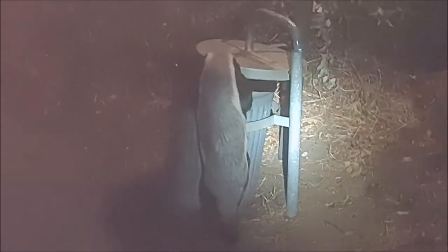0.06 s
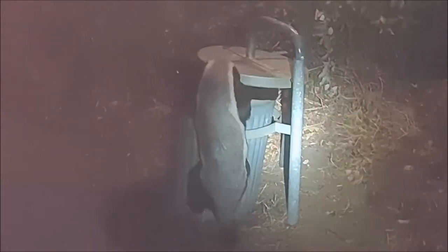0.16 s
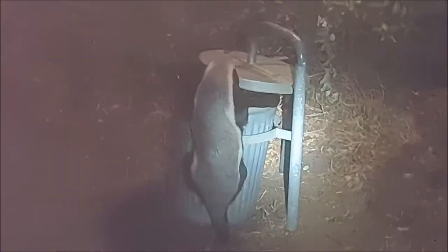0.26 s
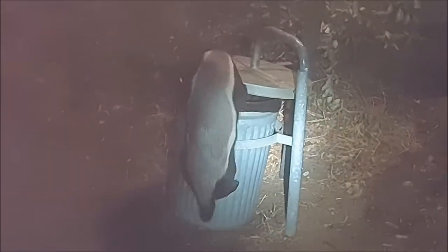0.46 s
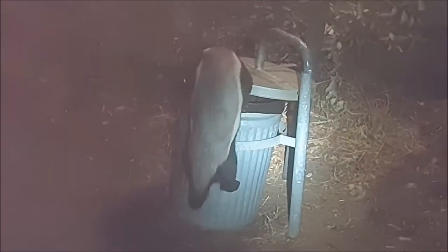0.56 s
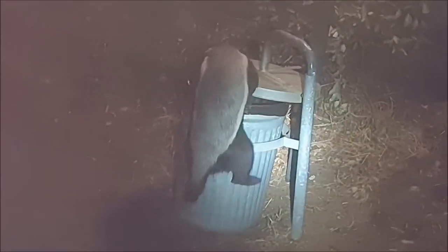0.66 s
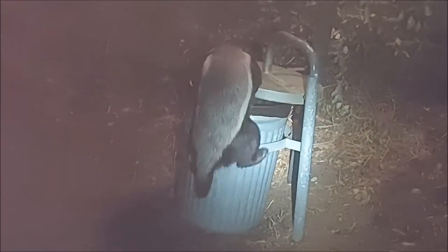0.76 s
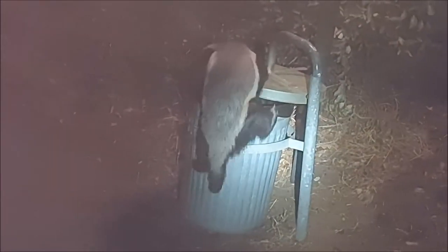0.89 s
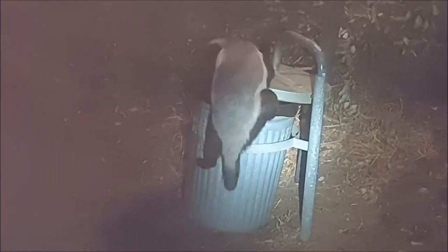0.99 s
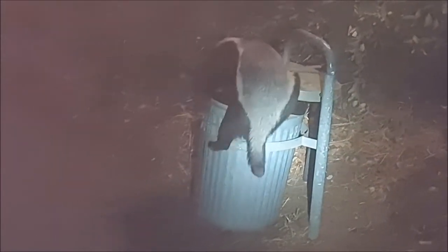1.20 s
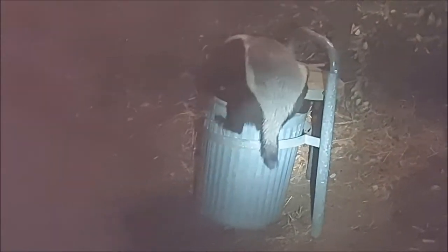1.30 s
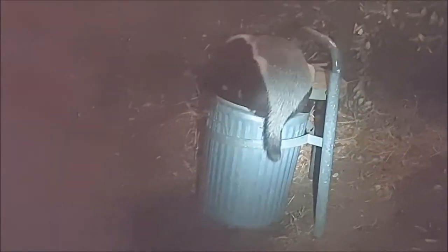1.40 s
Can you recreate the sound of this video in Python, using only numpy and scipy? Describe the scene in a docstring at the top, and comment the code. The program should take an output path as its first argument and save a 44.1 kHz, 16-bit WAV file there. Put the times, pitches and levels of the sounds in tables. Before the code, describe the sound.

A metal bin clatters close by as an animal climbs it. After faint taps, it slams loudly into its holder from about 0.25 to 0.5 seconds, with a low boom, scraping and a hollow ring. Claws drag from 0.55, with a few short knocks near 0.7. Lighter knocks and scratches follow from 1.0 to 1.4 seconds. The yard behind is very quiet, with only a faint echo.

```python
"""A ribbed metal bin clatters in its steel frame as an animal hauls itself up it.
A yard on a still night, the stereo microphone close by, with only a faint echo behind.
The bin slams against its holder and its wall booms as it flexes; claws scrape and knock on the metal.
Every contact rings the same shell: a few strong low modes under a dense wash of high ones."""
import sys
import numpy as np
from scipy import signal
from scipy.fft import rfft, irfft
from scipy.io import wavfile
from scipy.ndimage import uniform_filter1d

SR = 44100
rng = np.random.default_rng(int(sys.argv[2]) if len(sys.argv) > 2 else 0)


def dump_mix(stems):
    """Bounce the given channels to the path in sys.argv[1] as a 16-bit WAV at rate SR."""
    frames = np.atleast_2d(stems).T  # one column per channel
    limited = np.clip(frames, -1, 1)  # hard clip at full scale
    pcm = np.round(limited * 32767).astype(np.int16)
    wavfile.write(sys.argv[1], SR, pcm)


N = 63945
T = np.arange(N) / SR
RING_N = 3 * SR // 4  # samples in one ring of the sheet metal
BANDS_HZ = 32 * 2 ** (np.arange(37) / 4)
COLOUR_HZ = [110, 1000, 5000, 11000]  # centres of bass, middle, treble and top

# paws, lid and holder striking the bin
# (time [s], wall ring [dB], paw damping [dB/s], bass [dB], middle [dB], treble [dB], top [dB])
KNOCKS = [(0.0, -64.5, 20, -93, -61, -85.5, -83), (0.019, -61, 30, -57.5, -64, -74.5, -77),
          (0.056, -64, 10, -78, -68, -67.5, -76.5), (.193, -91, 198, -82, -95, -76, -73),
          (.230, -66, 17, -43, -47.5, -62, -61), (0.24, -43.5, 16, -36, -39, -42.5, -44.5),
          (.251, -42, 16, -45, -37, -34.5, -33), (.266, -61, 20, -36.5, -34.5, -34, -35),
          (.282, -48, 29, -35.5, -34, -35.5, -37.5), (.294, -41.5, 14, -32, -31.5, -37, -40),
          (.311, -51, 20, -36, -34.5, -38, -43), (.335, -52, 12, -41, -33.5, -43.5, -45),
          (.358, -52, 16, -40.5, -40.5, -49, -46), (.391, -46, 10, -47.5, -44.5, -75, -64),
          (.445, -51, 18, -48, -48, -46.5, -68), (.470, -61, 3, -36.5, -51, -53, -55.5),
          (.484, -50.5, 103, -42, -54, -45.5, -64.5), (.648, -53, 50, -62, -63, -59, -64.5),
          (0.69, -48.5, 59, -56, -49, -49, -56), (.706, -43.5, 130, -61, -49.5, -48.5, -53),
          (0.726, -44, 146, -79, -57, -43, -60.5), (1.012, -55, 56, -69.5, -45.5, -47.5, -55.5),
          (1.045, -64, 90, -55.5, -60, -52.5, -90), (1.111, -69, 433, -85, -58, -45.5, -64),
          (1.150, -68.5, 50, -87, -63.5, -59, -69), (1.250, -57, 500, -60, -48, -42, -52),
          (1.292, -50.5, 47, -56.5, -42, -48, -63), (1.310, -55, 47, -52, -51.5, -53, -69),
          (1.345, -58, 69, -42.5, -47.5, -53.5, -60.5), (1.385, -55.5, 22, -69, -65, -72, -84)]


def undb(db):
    """Decibels to gain."""
    return 10 ** (np.asarray(db) / 20)


def per_band(hz, values):
    """Values given at some frequencies, as a column with one per band."""
    return np.interp(np.log(BANDS_HZ), np.log(hz), values)[:, None]


def decay(t60):
    """Exponential fall by 60 dB in t60 seconds."""
    return np.exp(-np.log(1000) * T / t60)


def swell(length):
    """A half-sine rise and fall over length seconds."""
    return np.sin(np.pi * np.minimum(T / length, 1))


def delayed(x, start):
    """The sound, beginning at start seconds."""
    k = int(np.clip(start * SR, 0, N - 1))
    return np.concatenate([np.zeros_like(x[..., :k]), x[..., :N - k]], axis=-1)


def excite(response, force):
    """A stereo response driven by a force scaled to unit energy."""
    out = signal.fftconvolve(response, force[None] / np.linalg.norm(force), axes=-1)
    return np.pad(out, ((0, 0), (0, N)))[:, :N]


def ring(modes, blows):
    """Decaying sines; each blow (time [s], level [dB], damping [dB/s]) adds energy to every mode."""
    out = 0
    for hz, db, t60 in modes:
        energy = sum(delayed((undb(blow_db - abs(damping) * T) * decay(t60)) ** 2, start)
                     for start, blow_db, damping in blows)
        envelope = uniform_filter1d(np.sqrt(energy), size=90)
        out = out + undb(db) * envelope * np.sin(2 * np.pi * hz * T)
    return out


def stereo_bands():
    """Quarter-octave noises (channel, band, time), narrow in the bass and wide in the treble."""
    # image at the microphone (frequency [Hz], side minus mid [dB], left minus right [dB])
    image = [(58.5, -16.5, 1.5), (297, -12.5, -0.5), (710, -10, 1.3), (1440, -4, 5), (2960, -2, 4),
             (6300, -3.5, 2), (10300, 0, 6.5), (13900, 0, -2.5)]
    bin_hz = np.maximum(np.arange(N // 2 + 1) * SR / N, 1)
    octaves = np.log2(bin_hz / BANDS_HZ[:, None])
    band_shape = np.cos(np.clip(octaves * 4, -1, 1) * np.pi / 2)
    noise = irfft(band_shape * rfft(rng.standard_normal((2, len(BANDS_HZ), N))), N)
    mid, side = noise / noise.std(axis=-1, keepdims=True)
    hz, side_db, pan_db = np.array(image).T
    width, pan = undb(per_band(hz, side_db)), undb(per_band(hz, pan_db) / 2)
    return np.array([(mid + width * side) * pan, (mid - width * side) / pan]) / np.hypot(1, width)


def night_air():
    """Faint steady air all around the microphone."""
    # the still yard (frequency [Hz], band level [dB])
    air = [(30, -105), (60, -107), (110, -80.5), (250, -97), (800, -86), (1500, -91.5), (2700, -97),
           (4500, -90), (7500, -87), (15000, -93.5)]
    return undb(per_band(*np.array(air).T))[:, 0] @ stereo_bands()


def sheet_metal():
    """The shell's ring per band at a few points of contact: quick crack, dense wash, faint yard echo."""
    # dense modes of the sheet metal (frequency [Hz], band gain [dB])
    spectrum = [(40, -57), (65, -26.5), (110, -12.5), (210, -17.5), (400, -13.5), (650, -14.5),
                (880, -12.5), (1150, -15.5), (1500, -14.5), (2100, -16), (2700, -25.5), (3500, -12.5),
                (5000, -13.5), (7200, -5), (8800, -14), (10500, -9), (13000, -9.5), (15500, -14)]
    # how long they ring (frequency [Hz], T60 [s])
    ring_times = [(100, 0.4), (400, 0.44), (900, 0.24), (2500, 0.31), (6000, 0.18), (14000, 0.22)]
    wash = decay(per_band(*np.array(ring_times).T))
    crack = undb(-7.5) * decay(t60=0.08)
    yard_echo = undb(-26.5) * decay(t60=0.99)
    envelope = ((wash + crack + yard_echo) * undb(per_band(*np.array(spectrum).T)))[:, :RING_N]
    noise = stereo_bands()
    share = 0.17  # of the energy rings alike wherever the bin is hit
    common, own = np.sqrt(share) * noise[..., :RING_N], np.sqrt(1 - share) * noise
    return [(common + own[..., k:k + RING_N]) * envelope for k in range(SR // 8, N - RING_N, SR // 8)]


def knocks(points):
    """Each knock chatters briefly and rings the dense modes in its own colour; a resting paw damps them."""
    chatter_db, chatter_s = 3.5, 0.0087  # tiny rebounds: energy over the first touch, decay time
    out, age = np.zeros((2, N)), T[:N // 32]
    for k, (start, _, damping, *colour_db) in enumerate(KNOCKS):
        force = rng.standard_normal(len(age)) ** 3 * np.exp(-age / chatter_s)
        force *= undb(chatter_db) / np.linalg.norm(force)
        force[0] = 1  # the first touch
        colour = undb(per_band(COLOUR_HZ, colour_db))[:, 0]
        wash = colour @ points[k % len(points)] * undb(-abs(damping) * T[:RING_N])
        out += delayed(excite(wash, force), start)
    return out


def wall_notes():
    """The knocks also ring the clear notes of the ribbed wall, a little left of centre."""
    # modes of the wall (frequency [Hz], gain [dB], T60 [s])
    modes = [(242.8, -4.5, 0.15), (601.5, -5, 0.22), (691, -2.5, 0.22), (696, -7.5, 0.3), (946, -8, 0.3),
             (1005, -15.5, 0.54), (1174, -19, .22), (1460, -8, 0.096), (1940, -16, 0.16)]
    left_minus_right_db = 2.5
    pan = undb(np.array([[1], [-1]]) * left_minus_right_db / 2)
    return pan * ring(modes, [knock[:3] for knock in KNOCKS])


def wall_booms():
    """The wall gives under the animal's weight and comes back: a low boom that swells and fades."""
    # flexes of the wall (start [s], length [s], pitch [Hz], level [dB])
    flexes = [(.235, .12, 141.7, -35.5), (0.271, 0.084, 103, -37), (.42, .15, 118.3, -43.5),
              (0.557, 0.074, 119.5, -43), (0.826, 0.042, 124, -62.5), (1.015, 0.072, 147.4, -58.5),
              (1.28, .18, 102.2, -52.5)]
    return sum(delayed(undb(db) * swell(length) * np.sin(2 * np.pi * hz * T), start)
               for start, length, hz, db in flexes)


def holder_slams():
    """The whole bin swings into its holder and rings as a hollow body."""
    # blows against the holder (time [s], level [dB])
    slams = [(0.239, -46), (0.264, -35.5), (0.31, -38), (0.355, -37.5), (.575, -57)]
    # hollow modes of the bin (frequency [Hz], gain [dB], T60 [s])
    modes = [(195, -21, 1), (300.1, -6.5, 0.55), (347, 2, 0.27), (388.4, 1.5, 0.56), (403, -5.5, 0.65),
             (522, -5.5, 0.45), (619, -12, 0.48), (831, -15, 0.54), (879, -12.5, 0.42), (1425, -20, 0.2)]
    return ring(modes, [(start, db, 0) for start, db in slams])


def claw_scrapes(points):
    """Claws stick and slip, a swell of tiny clicks into the wall; the dragging pads add a dull rub."""
    # drags over the ribs (start [s], length [s], middle [dB], treble [dB], top [dB])
    drags = [(.25, 0.19, -33, -36.5, -46), (.56, 0.27, -44, -57, -64), (.69, 0.041, -45.5, -43, -71),
             (.80, 0.052, -60.5, -86, -83), (1.11, 0.28, -54.5, -54.5, -62.5),
             (1.229, 0.051, -49.5, -50.5, -66), (1.29, 0.099, -48.5, -53.5, -64.5)]
    slips_per_s, scatter_db = 700, 3.5
    rub_hz, rub_octaves = 303, 0.68
    rub_db = 6 * np.exp(-(np.log2(BANDS_HZ / rub_hz) / rub_octaves) ** 2)
    out = np.zeros((2, N))
    for k, (start, length, middle, treble, top) in enumerate(drags):
        slips = (rng.random(N) < slips_per_s / SR) * rng.choice([-1, 1], N)
        sizes = undb(scatter_db * rng.standard_normal(N))
        force = (slips * sizes * swell(length))[:RING_N]
        bass = middle - 14
        colour = undb(per_band(COLOUR_HZ, [bass, middle, treble, top])[:, 0] + rub_db)
        out += delayed(excite(colour @ points[k % len(points)], force), start)
    return out


def scene():
    """The bin under the animal in the quiet yard; the contacts drift slightly left past the microphone."""
    drift_db_per_s, centred_at_s = 0.5, 0.53
    pan = undb(np.array([[1], [-1]]) * drift_db_per_s * (T - centred_at_s) / 2)
    points = sheet_metal()
    contacts = pan * (knocks(points) + claw_scrapes(points))
    return contacts + wall_notes() + wall_booms() + holder_slams() + night_air()


def record(dry):
    """The recorder cuts the very top with a steep low-pass."""
    cutoff_hz = 15900
    return signal.sosfilt(signal.ellip(10, .2, 80, cutoff_hz, fs=SR, output="sos"), dry)


dry = scene()
out = record(dry)
dump_mix(out)
```